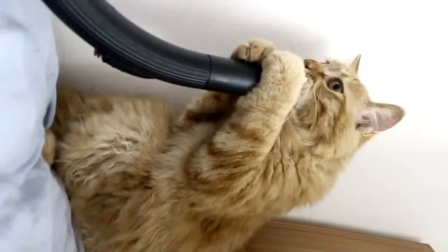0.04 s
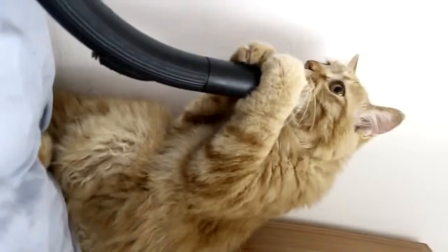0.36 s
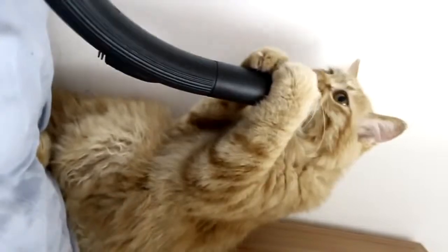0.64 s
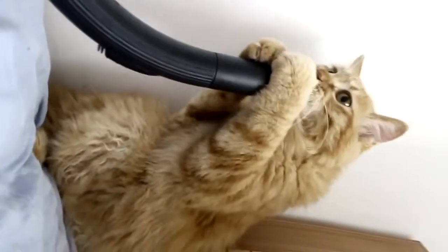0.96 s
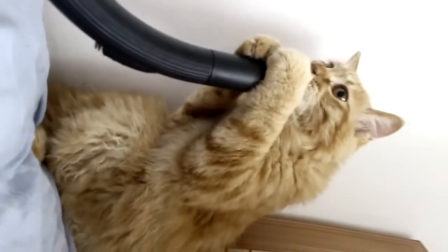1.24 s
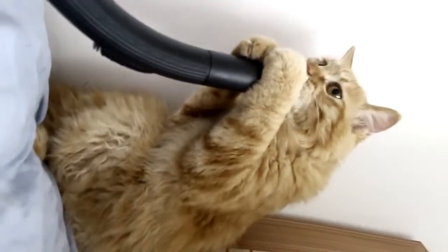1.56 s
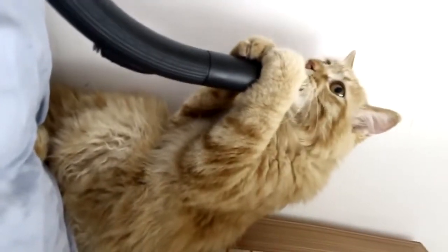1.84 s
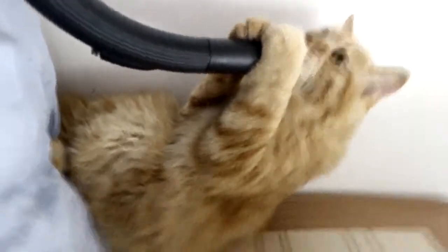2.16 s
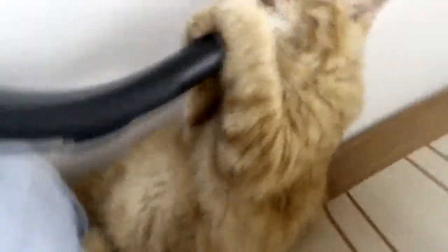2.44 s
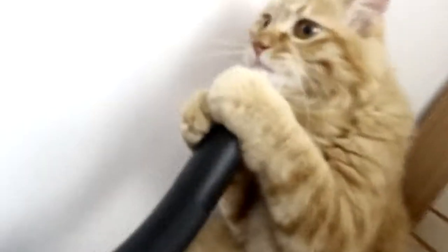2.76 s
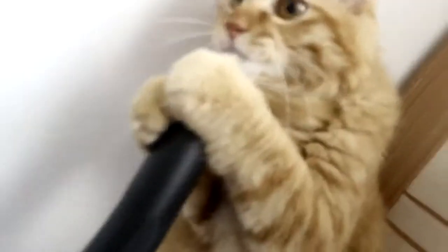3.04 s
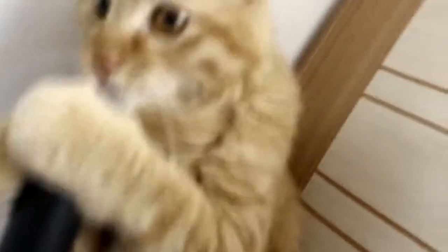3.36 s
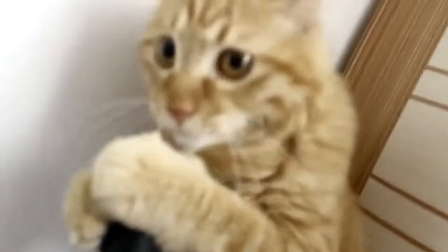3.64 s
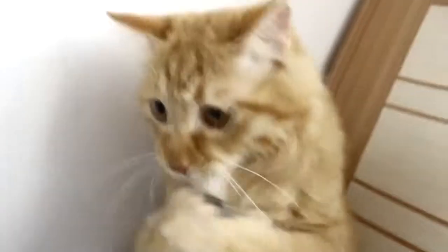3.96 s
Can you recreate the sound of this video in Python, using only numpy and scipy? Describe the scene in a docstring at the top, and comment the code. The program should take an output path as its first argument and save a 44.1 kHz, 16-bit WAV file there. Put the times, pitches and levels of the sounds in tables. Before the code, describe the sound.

A vacuum cleaner runs close by in a small room, air rushing over a motor hum and whine, with faint breathy whistles. Fur flutters in the hose opening at 0.5 seconds. Around 1.5 seconds it flutters again with low thuds, and a sharp snap of grit briefly dips the level. More fluttering and thuds come near 2 seconds. From 2.3 to 4 seconds the rush turns fuller and hollow, rising in tone.

```python
"""Cat hugging a vacuum hose

A vacuum cleaner runs in a small room: air rushes through the hose's resonances over the motor's hum
and whine. A cat's fur flutters in the opening, half blocks it and makes the hose thud. Grit snaps
against the tube, and the sharpest snap ducks the limiter. Then the hose swings away and the rush
turns hollow, its peaks rising."""
import sys
import numpy as np
from scipy import signal
from scipy.fft import rfft, irfft
from scipy.io import wavfile

SR = 44100
rng = np.random.default_rng(int(sys.argv[2]) if len(sys.argv) > 2 else 0)


def waveform_to_disk(signal):
    """Save audio, clipped to [-1, 1], as 16-bit WAV at the path in sys.argv[1]."""
    frames = np.transpose(np.atleast_2d(signal))
    scaled = np.clip(frames, -1, 1) * 32767
    samples = np.round(scaled).astype(np.int16)
    wavfile.write(sys.argv[1], SR, samples)


N = 176400
T = np.arange(N) / SR
HZ = np.maximum(np.arange(N // 2 + 1) * SR / N, 1)

# motor speed, rising when the air is choked: (time [s], speed [turns/s])
MOTOR_SPEED = [(.6, 400.6), (1.35, 399.8), (1.65, 402.3), (1.85, 401.6), (2.25, 403.8), (2.65, 401),
               (3.7, 399.6)]
# hum at the turning rate: (time [s], level [dB])
SHAFT_HUM = [(.2, -30.5), (1.35, -31), (1.52, -39), (1.65, -38), (1.9, -34), (2.07, -38.5), (2.55, -30.5),
             (3.1, -43)]
# whine at twice the blade rate: (time [s], level [dB])
FAN_WHINE = [(.66, -32.5), (.83, -47), (1.05, -36), (1.32, -44), (1.65, -38), (2.02, -36), (2.4, -44),
             (2.65, -36), (2.88, -42), (3.05, -32.5), (3.14, -41), (3.3, -24.5), (3.45, -42), (3.56, -42),
             (3.7, -31), (3.9, -38)]
# whine at 3 and 4 times the blade rate: (time [s], level of 3x [dB], level of 4x [dB])
FAN_OVERTONES = [(.6, -49, -50), (1.25, -50, -47.5), (1.9, -43, -58), (2.7, -51, -51), (3.35, -43, -54),
                 (4, -49, -56)]
# faint machine drones: (frequency [Hz], level [dB])
LOW_DRONES = [(100, -51), (300, -48)]
# colour of the rush heard by way of the room: (frequency [Hz], density [dB per Hz])
ROOM_RUSH_COLOUR = [(25, -87), (100, -70), (280, -64.5), (600, -59), (850, -55), (1500, -54.5),
                    (2600, -55.5), (8000, -66), (15800, -78)]
# room modes: (frequency [Hz], width [Hz], lift [dB])
ROOM_PEAKS = [(60.6, 13, 19), (524, 16.5, 8.9), (892, 60, 1.6)]
# fader and tone of that rush: (time [s], gain [dB], tilt above 1.5 kHz [dB/octave])
HOSE_SWING = [(2.15, -19.5, 5), (2.4, -2.5, -2), (3.1, -2, 0.5), (3.35, 0, 0.16), (3.78, -.5, 0),
              (4, -0.5, -1)]
# colour of air drawn into the nozzle: (frequency [Hz], density [dB per Hz])
SUCTION_COLOUR = [(25, -82.5), (120, -70.5), (280, -60), (480, -58), (800, -64.5), (1400, -58),
                  (2300, -61.5), (3600, -57), (6500, -65), (8500, -65.5), (15800, -83.5)]
# resonances of the hose end: (frequency [Hz], width [Hz], lift [dB])
HOSE_PEAKS = [(1830, 330, 4), (2880, 300, 4.5), (4040, 210, 1), (4500, 69, 2.5), (5900, 440, 3.5),
              (7480, 570, 4), (9600, 560, 3), (11900, 2000, 3)]
# strength of the suction: (time [s], gain [dB])
AIRFLOW = [(.2, 0.6), (1.35, 1), (1.5, -1.5), (1.64, -5), (1.85, -2.5), (2.15, -6), (2.3, -3), (2.55, -7)]
# breathy whistles at the rim: (start [s], end [s], pitch [Hz], width [Hz], level [dB])
RIM_WHISTLES = [(.1, 0.545, 3720, 1000, -26.5), (0.544, 1.054, 2930, 480, -23.3),
                (2.253, 2.417, 3500, 650, -29), (2.91, 3.11, 3620, 700, -27.7),
                (3.24, 3.45, 3660, 300, -29.5), (3.62, 3.8, 2680, 650, -31)]
# middle peak of the swinging hose's hollow colour: (time [s], frequency [Hz])
HOLLOW_SWEEP = [(2.75, 3400), (3.15, 3600), (3.3, 3880), (3.5, 4130), (3.7, 4570), (3.85, 4900),
                (3.95, 5400)]
# fur slapping in the opening: (time [s], gain [dB])
FUR_SLAPS = [(0.448, 1.5), (.463, 1), (0.482, 4), (.498, 2), (.513, 1.5), (1.389, 6), (1.402, 0),
             (1.429, 3.5), (1.438, 2), (1.456, 3), (1.497, 5), (1.513, 7), (1.562, 2), (1.863, 0),
             (1.883, 2), (1.897, 2.5), (1.909, 3), (1.927, 2), (1.948, 2), (1.969, 3), (1.989, 3),
             (2.021, 2), (2.039, 1.5), (2.066, 3)]
# colour of the slaps: (frequency [Hz], density [dB per Hz])
SLAP_COLOUR = [(100, -67), (500, -54), (1200, -60), (2500, -59), (4600, -52), (6600, -56), (7400, -50.5),
               (8400, -59.5), (10500, -70), (12400, -63), (13300, -73)]
# chokes that thud the hose: (time [s], level [dB])
CHOKES = [(1.418, -26), (1.456, -22.5), (1.51, -18), (1.88, -26), (1.94, -23.5), (2.018, -21), (2.056, -22)]
# modes of the air in the long hose: (frequency [Hz], gain [dB])
AIR_COLUMN_MODES = [(104, -6), (184, 1), (284, -6)]
# grit hitting the tube: (time [s], gain [dB], pitch [ratio])
GRIT_HITS = [(1.4905, 11, 1), (1.5095, -4, .55), (1.5281, 3, 1.3)]
# ring of the plastic tube: (frequency [Hz], level [dB], t60 [s])
TUBE_MODES = [(4590, -18, 0.049), (6050, -11.5, 0.012), (6190, -18, 0.014), (6920, -16.5, 0.018),
              (8000, -29, 0.009)]


def from_db(db):
    """Decibels to gain."""
    return 10 ** (np.asarray(db) / 20)


def unit_rms(x):
    """Scale to rms 1."""
    return x / np.sqrt(np.mean(x ** 2) + 1e-20)


def automation(rows):
    """One per-sample curve for each column after the time."""
    times, *columns = np.transpose(rows)
    return [np.interp(T, times, column) for column in columns]


def drift(rate_hz):
    """Random wobble, mostly slower than rate_hz; rms 1."""
    return unit_rms(irfft(rfft(rng.standard_normal(N)) / (1 + (HZ / rate_hz) ** 2), N))


def air_noise(colour, peaks):
    """Noise of a given colour, lifted at each resonance."""
    hz, db = np.transpose(colour)
    db = np.interp(np.log(HZ), np.log(hz), db)
    for centre, width, lift in peaks:
        db = db + lift * np.exp2(-(2 * (HZ - centre) / width) ** 2)
    return irfft(rfft(rng.standard_normal(N)) * from_db(db), N) * np.sqrt(SR / 2)


def noise_band(hz, half_width_hz):
    """Noise passed twice through one resonance; rms 1."""
    response = 1 / (1 + .5j * hz / half_width_hz * (HZ / hz - hz / HZ)) ** 2
    return unit_rms(irfft(rfft(rng.standard_normal(N)) * response, N))


def swell(start_s, end_s, fade_s):
    """Envelope that fades in, holds and fades out."""
    return np.clip(np.minimum(T - start_s, end_s - T) / fade_s + .5, 0, 1)


def puff(start_s, attack_s, decay_s):
    """Envelope that rises quickly and dies away."""
    age = np.clip(T - start_s, 0, .5)
    return (1 - np.exp(-age / attack_s)) * np.exp(-age / decay_s)


def small_room(x, t60_s=.23, wet_db=-12):
    """Dense reflections leave a fine, steady ripple in the rush."""
    age = T[:SR // 2]
    tail = rng.standard_normal(len(age)) * from_db(-60 * age / t60_s) * (age > .003)
    reverb = signal.fftconvolve(x, tail / np.linalg.norm(tail))[:N]
    wet = from_db(wet_db)
    return (x + wet * reverb) / np.hypot(1, wet)


def motor(blades=9, jitter=.00039, hum_waver_db=1.5, whine_waver_db=3, fading_db=1):
    """Shaft hum, fan whine and low drones; the overtones fade in and out in the room."""
    speed, = automation(MOTOR_SPEED)
    shaft_phase = 2 * np.pi * np.cumsum(speed * (1 + jitter * drift(27))) / SR
    hum_db, = automation(SHAFT_HUM)
    out = from_db(hum_db + hum_waver_db * drift(17)) * np.sin(shaft_phase)
    overtones_db = [db + fading_db * drift(6.7) for db in automation(FAN_OVERTONES)]
    for harmonic, db in enumerate(automation(FAN_WHINE) + overtones_db, start=2):
        out += from_db(db + whine_waver_db * drift(30)) * np.sin(harmonic * blades * shaft_phase)
    for hz, db in LOW_DRONES:
        out += from_db(db + hum_waver_db * drift(9.1)) * np.sin(2 * np.pi * hz * T)
    return np.sqrt(2) * out


def room_rush():
    """The wash of air in the room swells and shifts tone as the hose swings."""
    db, tilt = automation(HOSE_SWING)
    spectrum = rfft(air_noise(ROOM_RUSH_COLOUR, ROOM_PEAKS))
    octaves, bands = np.log2(HZ / 1500), np.arange(5)
    out = np.zeros(N)
    for band in bands:
        crossover = np.interp(octaves, bands, bands == band)
        out += irfft(spectrum * crossover, N) * from_db(db + tilt * band)
    return out


def nozzle(turbulence_db=.72):
    """Turbulent air in the hose end, with whistles that come and go at the rim."""
    flow_db, = automation(AIRFLOW)
    out = from_db(flow_db + turbulence_db * drift(36)) * air_noise(SUCTION_COLOUR, HOSE_PEAKS)
    for start, end, hz, width, db in RIM_WHISTLES:
        out += from_db(db) * swell(start, end, fade_s=.068) * noise_band(hz, width / 2)
    return out


def hollow_hose(x, spacing_hz=1920, depth_db=3.7, reach_octaves=1.6):
    """As the hose swings, a comb of peaks and notches slides up the rush, wavering in depth."""
    hz, times, frames = signal.stft(x, SR, nperseg=512)
    hz = hz[:, None]
    centre = np.interp(times, *np.transpose(HOLLOW_SWEEP))
    amount = swell(2.3, 3.97, fade_s=.25) * (1 + .3 * drift(5))
    reach = np.exp2(-(np.log2((hz + 1) / centre) / reach_octaves) ** 2)
    comb = np.cos(2 * np.pi * (hz - centre) / spacing_hz)
    comb_db = depth_db * np.interp(times, T, amount) * reach * comb
    return signal.istft(frames * from_db(comb_db), SR)[1][:N]


def fur_flutter():
    """Each slap of fur sends a short puff through the hose end."""
    slaps = sum(from_db(db) * puff(start, attack_s=.003, decay_s=.008) for start, db in FUR_SLAPS)
    return slaps * air_noise(SLAP_COLOUR, HOSE_PEAKS)


def hose_thuds(roughness=.3):
    """Each choke sets the air in the long hose ringing, low and rough."""
    out = np.zeros(N)
    for hz, mode_db in AIR_COLUMN_MODES:
        eddies = roughness * noise_band(hz, half_width_hz=25)
        for start, db in CHOKES:
            ring = np.sin(2 * np.pi * hz * (T - start)) + eddies
            out += from_db(db + mode_db) * puff(start, attack_s=.01, decay_s=.03) * ring
    return out


def grit_snaps():
    """Hard grains strike the plastic tube, which rings bright and short."""
    out = np.zeros(N)
    for start, db, pitch in GRIT_HITS:
        age = np.clip(T - start, 0, 1)
        for hz, mode_db, t60 in TUBE_MODES:
            decay = from_db(-60 * age / t60) * (age < 2 * t60)
            out += from_db(db + mode_db) * decay * np.sin(2 * np.pi * hz * pitch * age)
    return out


def scene():
    """Motor bed, rushing air and close hits, the same in both channels."""
    bed = motor()
    rush = hollow_hose(small_room(nozzle() + room_rush()))
    return np.tile(bed + rush + fur_flutter() + hose_thuds() + grit_snaps(), (2, 1))


def record(dry, limit_db=-1, attack_s=.0045, release_db_per_s=24, start_s=.187, cutoff_hz=15800):
    """A limiter ducks fast and recovers slowly; peaks clip, the sound cuts in and the top is cut."""
    over_db = np.maximum(20 * np.log10(np.abs(dry).max(axis=0) + 1e-9) - limit_db, 0)
    held_db = np.maximum.accumulate(over_db + release_db_per_s * T) - release_db_per_s * T
    pole = np.exp(-1 / (attack_s * SR))
    duck_db = signal.lfilter([1 - pole], [1, -pole], held_db)
    clipped = np.clip(dry * from_db(-duck_db), -1, 1)
    lowpass = signal.ellip(12, .1, 70, cutoff_hz, fs=SR, output="sos")
    return signal.sosfilt(lowpass, clipped * (T > start_s))


dry = scene()
out = record(dry)
waveform_to_disk(out)
```